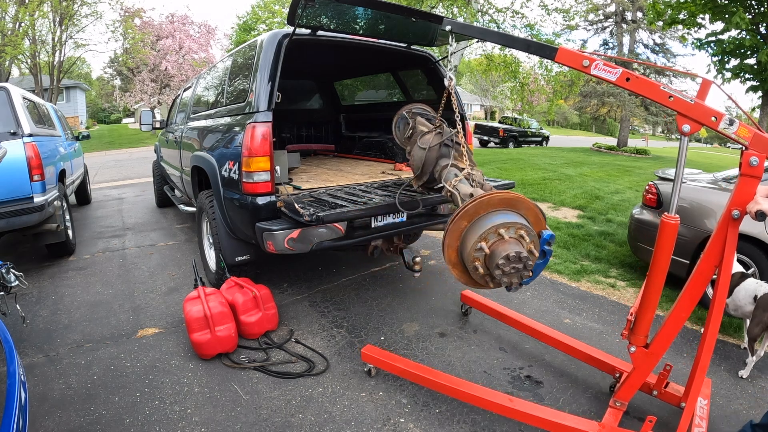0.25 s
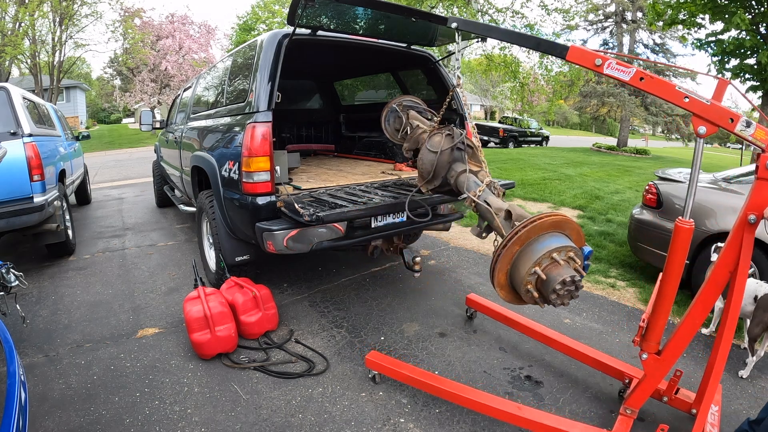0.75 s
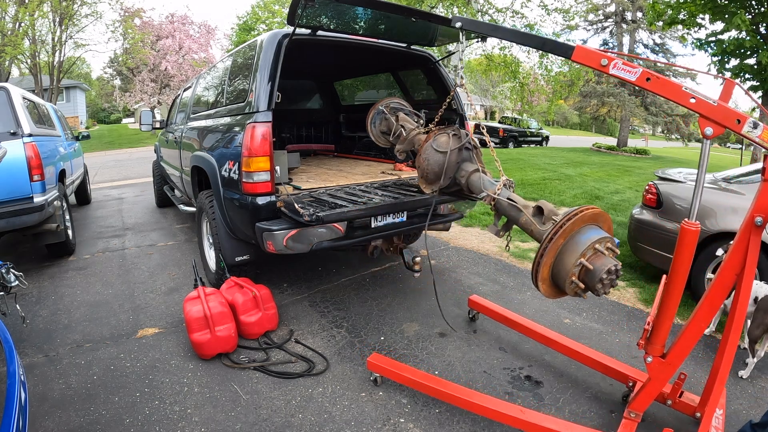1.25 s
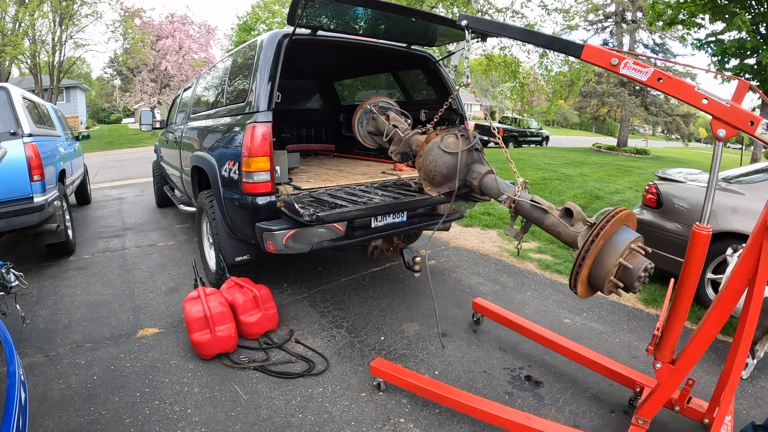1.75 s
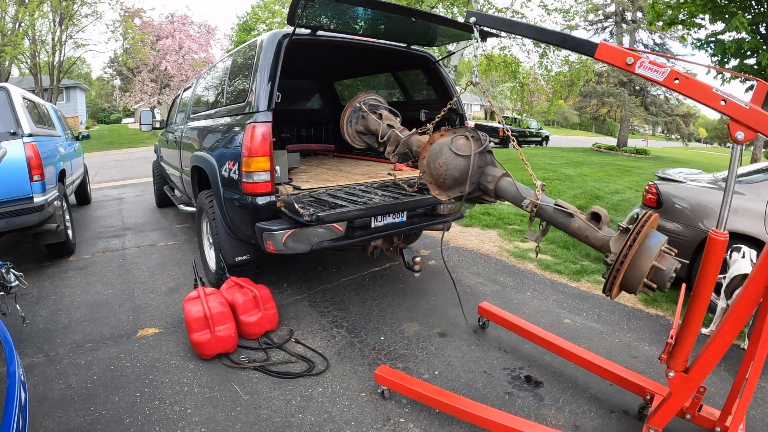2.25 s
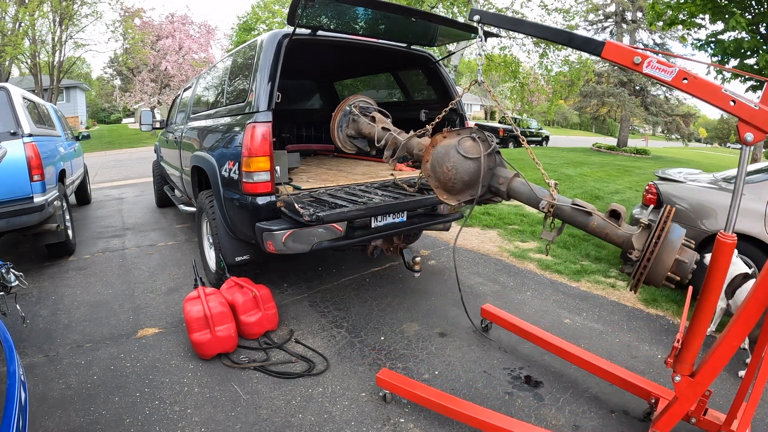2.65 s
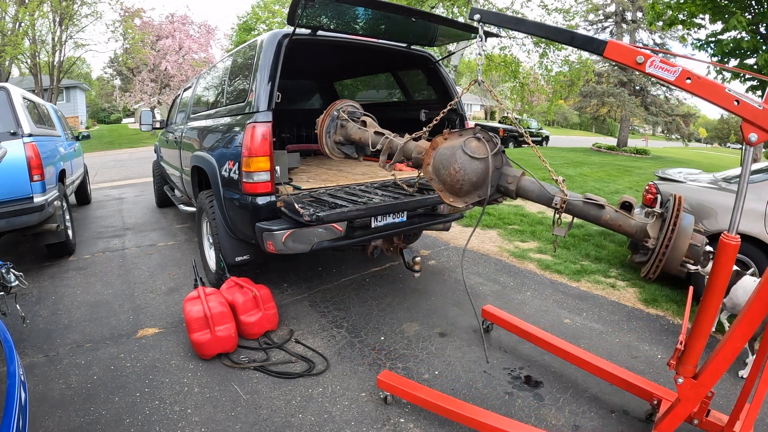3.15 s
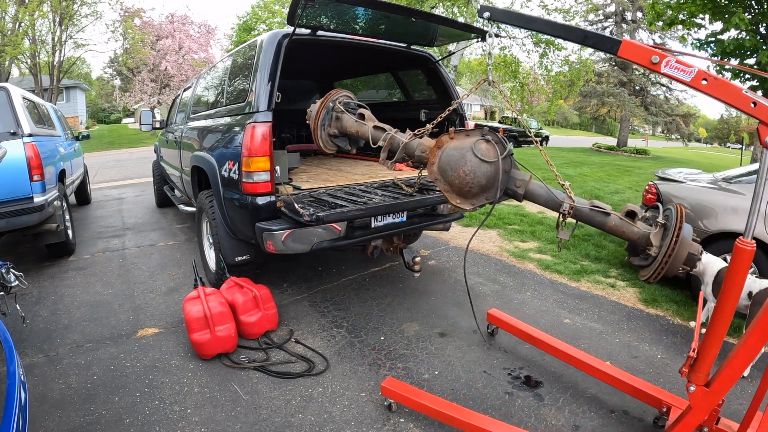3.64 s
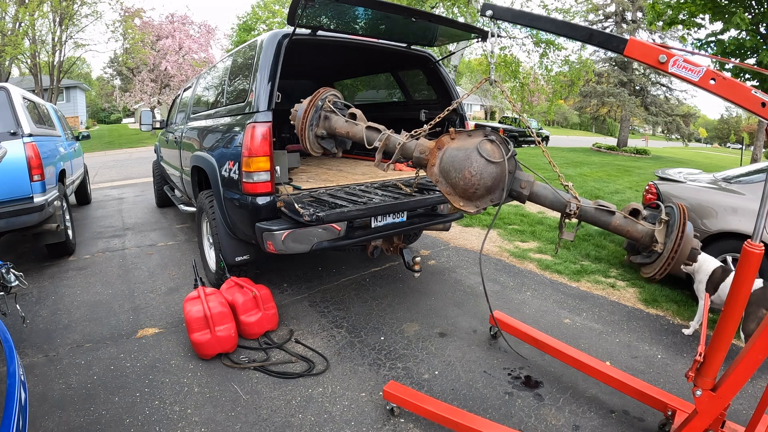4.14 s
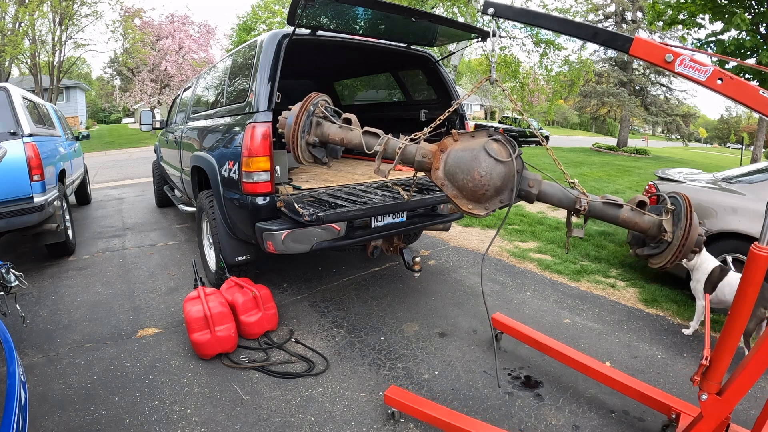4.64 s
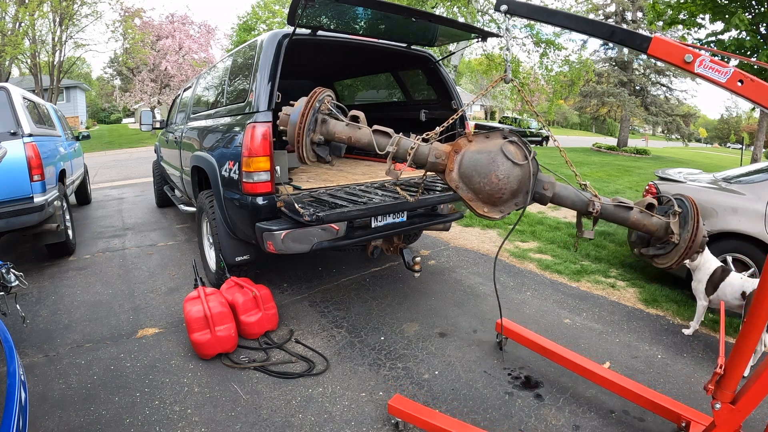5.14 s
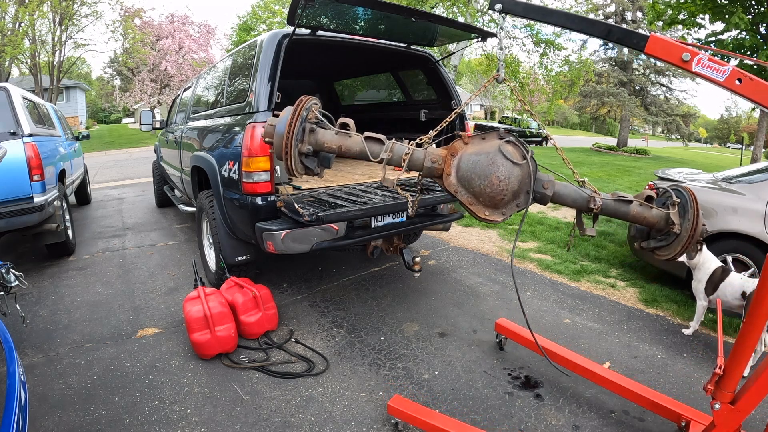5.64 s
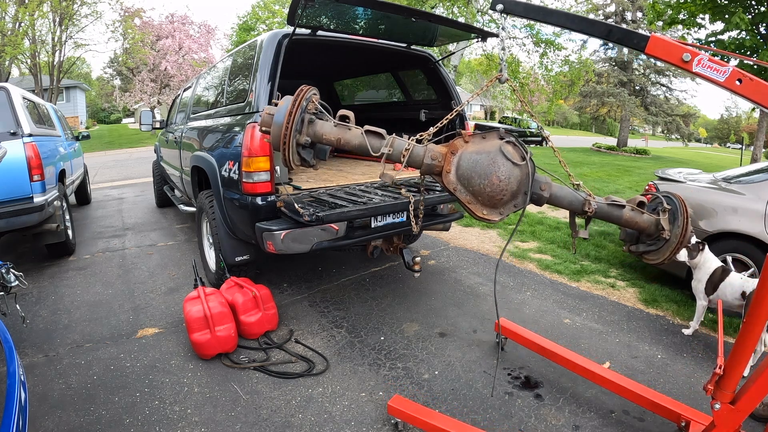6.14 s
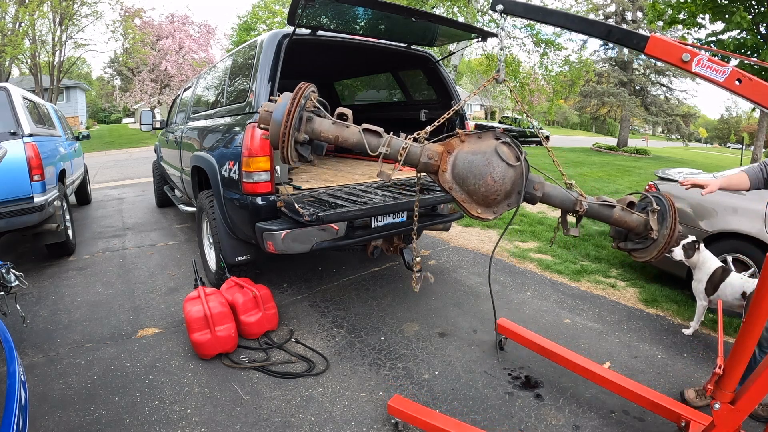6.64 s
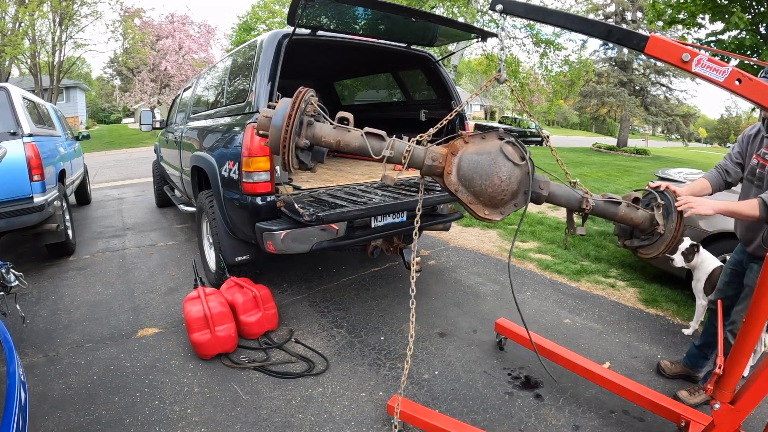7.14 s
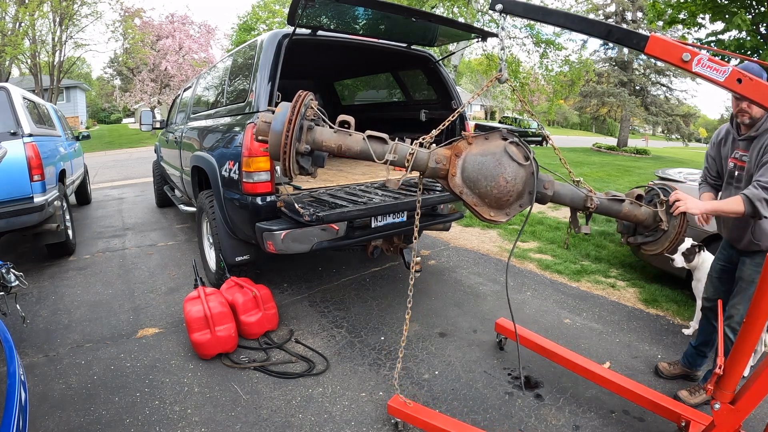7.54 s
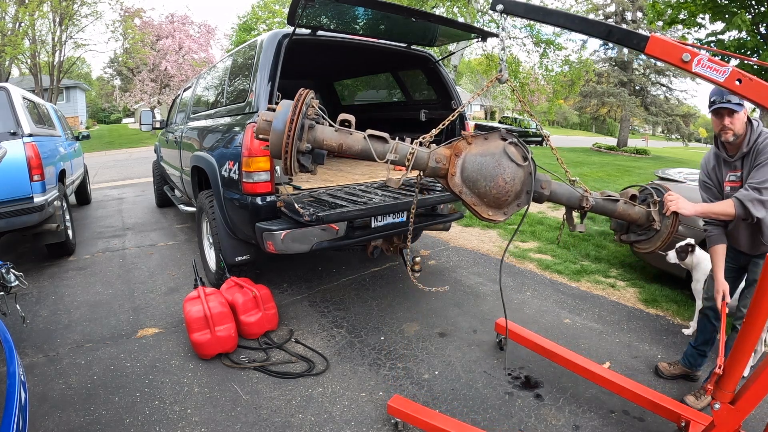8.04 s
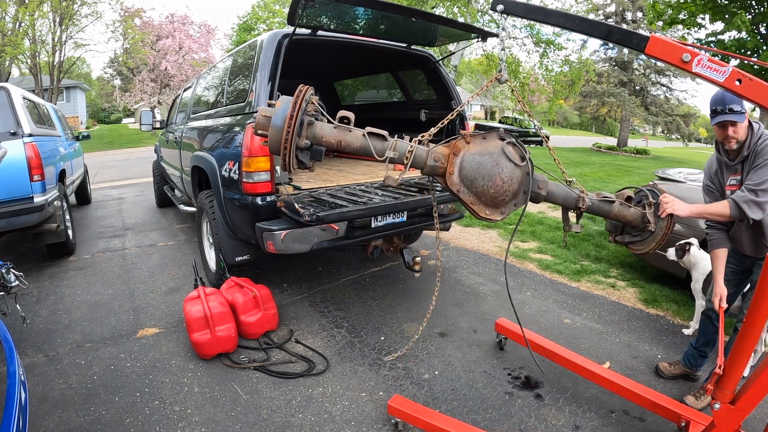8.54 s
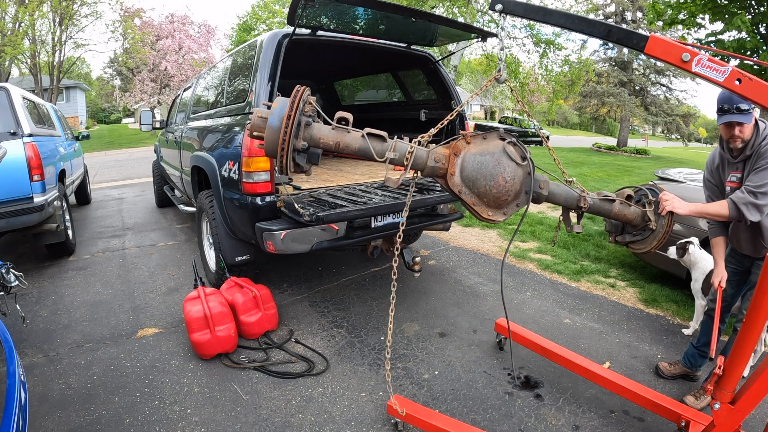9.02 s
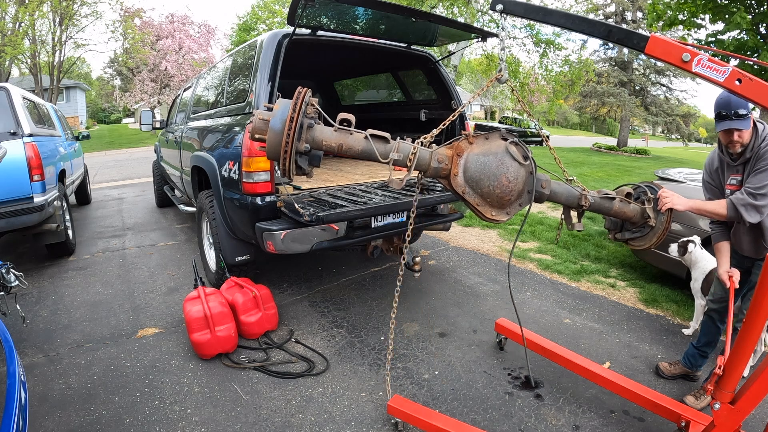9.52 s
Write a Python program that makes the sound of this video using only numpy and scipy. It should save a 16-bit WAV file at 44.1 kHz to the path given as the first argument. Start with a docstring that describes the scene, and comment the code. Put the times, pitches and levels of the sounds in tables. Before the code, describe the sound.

Outdoors on asphalt, a few light clanks and chain jingles build into the gritty rattle of a nearby steel hoist rolling on hard casters. It lurches along in several pushes, its tubes ringing at each bump, then comes to rest. The swinging chain ticks and twice hits the metal leg sharply. Behind it are soft shoe scuffs, a far songbird and a low hum that cuts off just before a faint squeak.

```python
"""An asphalt yard, where a steel engine hoist is dragged along. Its hard casters grind on grit and drop
off stones, shaking the frame and ringing its hollow tubes; heavy lurches thump the ground. Chain links
tinkle and tick, soles scuff, and once the hoist rests a loose chain end strikes a leg. A songbird
whistles far off, over a street hush and a low hum that cuts off; a faint squeak follows.
Cars and walls throw back short echoes."""
import sys
import numpy as np
from scipy import signal
from scipy.fft import rfft, irfft, next_fast_len
from scipy.io import wavfile
from scipy.ndimage import map_coordinates

SR = 44100
rng = np.random.default_rng(int(sys.argv[2]) if len(sys.argv) > 2 else 0)


def wrap_up_sound(samples):
    """Save the sound to the file named by the first command line argument, as 16-bit audio."""
    columns = np.atleast_2d(samples).T
    # keep every value between -1 and 1, then stretch to whole-number steps
    tamed = np.clip(columns, -1, 1)
    steps = np.round(tamed * 32767).astype(np.int16)
    wavfile.write(sys.argv[1], SR, steps)


N = 431298
TIME_S = np.arange(N) / SR

# The rolling grind, as the fader of its middle band: time_s, level_db
ROLLING = [(0.0, -62), (0.43, -95), (0.63, -49), (0.95, -45.5), (1.1, -54), (1.4, -106), (1.66, -40.5),
           (1.82, -34), (1.88, -32.5), (2.0, -29), (2.14, -32.5), (2.33, -44.5), (2.63, -39.5),
           (3.18, -60.5), (3.42, -45), (3.74, -34.5), (3.82, -29.5), (3.93, -34), (4.01, -46.5),
           (4.29, -45), (4.49, -32), (4.57, -33.5), (4.79, -41), (5.08, -45), (5.2, -42), (5.81, -37.5),
           (6.39, -31), (6.45, -33.5), (6.58, -66), (7.1, -77.5)]
# Casters dropping off stones: start_s, level_db, treble_offset_db, low_offset_db, tube_hz, ring_offset_db
STONE_DROPS = [(0.433, -35.5, -26, -20, 1267, -6), (0.461, -35.5, -28, -19, 1290, -10),
               (0.4877, -26, -26, -26, 1320, -7.5), (0.491, -27, -25, -30, 2940, -10),
               (0.493, -34, -30, -30, 1900, -10), (0.691, -32, -23, -16, 1287, -8.5),
               (0.8596, -23, -12.5, -21, 2820, -18), (1.041, -25.5, -16, -18.5, 1430, -22),
               (1.3055, -36.5, -12, -28, 1560, -22), (1.679, -24.5, -25, -20, 1570, -25),
               (1.711, -23, -11.5, -30, 1380, -15.5), (1.7947, -21.5, -32, -25.5, 1370, -17.5),
               (1.812, -16.5, -17.5, -28, 2030, -17.5), (1.8476, -15.5, -16.5, -19, 1390, -18.5),
               (1.893, -16, -20.5, -24, 2646, -18.5), (1.9242, -14, -12.5, -18, 960, -23),
               (2.021, -21.5, -19, -11, 1400, -17), (2.0556, -18, -15, -18, 970, -28),
               (2.081, -20, -19, -30, 1600, -17), (2.1333, -19, -17.5, -33, 964, -19.5),
               (2.165, -21, -12, -21, 1430, -27), (2.195, -20, -19, -22, 1400, -22),
               (2.268, -24, -18.5, -24, 2420, -19.5), (2.2854, -16.5, -33, -19.5, 1330, -22),
               (2.309, -17.5, -20.5, -21.5, 3040, -19.5), (2.5042, -20.5, -27, -20, 1295, -17.5),
               (2.595, -27, -26.5, -27, 2480, -21), (2.6783, -29, -15, -13.5, 1340, -20.5),
               (2.7712, -25, -22.5, -13, 1360, -33), (2.9708, -33, -37, -14.5, 1430, -20),
               (3.0751, -15, -17, -20.5, 1390, -16), (3.1098, -20.5, -29, -14.5, 1700, -18),
               (3.167, -25, -18.5, -25, 961, -22.5), (3.3762, -31.5, -39, -26, 1430, -9.5),
               (3.5382, -27, -5, -24.5, 3670, -7), (3.584, -23.5, -23.5, -22.5, 1400, -15.5),
               (3.592, -18.5, -14, -26, 940, -26), (3.6358, -13, -18.5, -24.5, 1380, -21.5),
               (3.651, -29.5, -25, -18.5, 3670, -7.5), (3.6978, -19.5, -19.5, -20.5, 1750, -17.5),
               (3.734, -19.5, -10.5, -24, 2450, -13.5), (3.7763, -25.5, 0.5, -20.5, 1390, -20.5),
               (3.802, -18, -26.5, -26, 1320, -13.5), (3.8148, -8, -10.5, -23, 1310, -18),
               (3.9048, -13, -12, -15, 744, -13), (4.095, -36, -7, -26, 2850, -16.5),
               (4.1919, -28.5, -23, -18.5, 1880, -21.5), (4.274, -21, -27, -25, 2430, -20),
               (4.3086, -23, -20.5, -17.5, 1440, -22), (4.339, -17, -15.5, -16.5, 1430, -16),
               (4.355, -12, -15, -26, 1360, -26.5), (4.3802, -13.5, -19.5, -17.5, 1470, -18.5),
               (4.4062, -13, -18.5, -26.5, 2480, -28.5), (4.4607, -13.5, -16.5, -26, 1420, -14),
               (4.5138, -17, -12.5, -23, 1490, -19.5), (4.5983, -19, -11.5, -28, 3200, -10.5),
               (4.6199, -11.5, -14, -28, 1370, -19), (4.657, -10, -14.5, -23, 1680, -28.5),
               (4.7742, -20, -15, -31, 1520, -25), (4.8137, -25, -20, -31, 1410, -24.5),
               (4.9833, -27.5, -24.5, -35, 1100, -21), (5.0379, -30, -18, -28, 2420, -11),
               (5.0565, -20.5, -21, -21.5, 2340, -16.5), (5.1072, -18.5, -22.5, -24, 935, -18),
               (5.2662, -20.5, -20.5, -38, 1460, -28.5), (5.361, -31, -14, -30, 1310, -21),
               (5.4146, -18, -11, -24, 965, -23.5), (5.5294, -21, -19, -20.5, 1410, -30.5),
               (5.552, -21, -18, -17.5, 1340, -27.5), (5.609, -32.5, -12, -13, 1410, -8),
               (5.775, -24.5, -31, -13, 1270, -23), (5.99, -19, -19.5, -22, 984, -21.5),
               (6.0518, -23.5, -23, -16, 1360, -17), (6.113, -26.5, -15, -17, 1710, -19.5),
               (6.1682, -15.5, -22.5, -13, 1470, -17.5), (6.2996, -9, -24.5, -18.5, 1360, -28),
               (6.3762, -15, -9.5, -17.5, 3240, -11), (6.4029, -12, -14.5, -24, 3030, -16),
               (6.456, -13, -9.5, -11.5, 1320, -25), (6.48, -20, -28.5, -12, 460, -17),
               (6.5081, -11, -15, -16.5, 756, -14), (6.534, -27, -20, -15, 968, -13),
               (6.8127, -32, -1, -42, 1520, -16), (6.8498, -38.5, -5, -24, 970, -15.5)]
def casters():
    """Grit shakes the frame and crackles; every drop off a stone adds a burst whose treble dies first."""
    stop = np.clip((ROLLING[-1][0] - TIME_S) / 0.141, 0, 1)
    halt_s = 6.58  # a low groan as the casters drag to a stop
    groan = amp(-27) * np.exp(-((TIME_S - halt_s) / np.where(TIME_S < halt_s, 0.16, 0.035)) ** 2)
    when, size = rng.random((700, 2)).T
    pebbles = decays(when * (N - 1) / SR, -6 - 9 * np.log10(size + .03), t60=0.035)  # crushed, they crack
    grind = {"low": np.hypot(follow_roll(-36, slope=0.83), groan) * np.hypot(0.73, 0.31 * pebbles),
             "middle": amp(curves(ROLLING)[0]) * np.hypot(0.59, 1.2 * pebbles),
             "treble": follow_roll(-50, slope=0.99) * np.hypot(0.84, 1.6 * pebbles)}
    start_s, level_db, treble_db, low_db, *_ = np.transpose(STONE_DROPS)
    jolt_db = {"low": level_db + low_db, "middle": level_db - 8.5, "treble": level_db + treble_db}

    def shake(register, t60):
        body = decays(start_s, jolt_db[register], t60, rise_s=0.0063)
        crack = decays(start_s, jolt_db[register] - 0.5, t60=0.015, rise_s=0.00034)
        jolts = body if register == "low" else np.hypot(body, crack)
        return np.hypot(stop * grind[register], jolts)
    return frame(shake)


# Tone of the shaken steel: frequency_hz, level_db
FRAME_EQ = [(120, -41.5), (200, -15), (350, -10.5), (410, -19), (550, -17.5), (1000, -5.5), (1350, -7),
            (1900, -4.5), (3100, -5.5), (4000, -14.5), (5200, -24.5), (7000, -25), (8500, -35),
            (11000, -32.5), (13500, -50.5), (16300, -69.5)]
# Edges of the frame's five bands: frequency_hz
BAND_EDGES = [240, 900, 2000, 4200, 8500, 40000]
# Tail of a jolt in each band: t60_s
BAND_TAILS = [0.41, 0.23, 0.15, 0.1, 0.029]
def frame(shake):
    """The frame answers in overlapping bands of gritty noise, each shaped by shake(register, t60)."""
    def steel(hz):
        peaks_db = sum(db / (1 + ((hz - pitch) / (width / 2)) ** 2) for pitch, width, db in TUBE_MODES)
        return amp(along(FRAME_EQ, hz) + peaks_db)

    def crossover(hz, edge_hz):
        return np.clip(.5 + 2 * np.log2((hz + 1) / edge_hz), 0, 1)

    grit = amp(1.5 * wobble(350) + 0.3 * wobble(60))
    bands, out = [], 0
    for low, high in zip(BAND_EDGES, BAND_EDGES[1:]):
        band = noise(lambda hz: steel(hz) * np.sqrt(abs(crossover(hz, low) - crossover(hz, high))), grit)
        bands.append(band * amp(0.19 * wobble(25)))
    for register, members in {"middle": (1, 2), "low": (0,), "treble": (3, 4)}.items():
        rms = np.sqrt(np.mean(sum(bands[k] for k in members) ** 2))
        out = out + sum(bands[k] / rms * shake(register, BAND_TAILS[k]) for k in members)
    return out


# Resonances of the hollow tubes: pitch_hz, width_hz, boost_db
TUBE_MODES = [(250, 81, 4), (366, 46, 4), (453, 34, 13), (515, 20, 11), (598.6, 60, 10), (691.6, 20, 9.5),
              (755, 22, 3), (964.8, 15, 11), (1215, 14, 8.5), (1311.6, 30, 5.5), (1365, 170, 6.5),
              (1425, 45, 3.5), (1520, 69, 3), (1673, 14, 8), (1926, 20, 2.5), (2420, 39, 5.5),
              (2707, 13, 5.5), (2970, 23, 0.5), (3200, 34, -1), (3660, 18, 4.5)]
def tubes():
    """Each jolt rings the hollow tubes; a narrow resonance rings long."""
    out = np.zeros(N)
    hz, width_hz, _ = np.transpose(TUBE_MODES)
    t60 = 1.09 * np.log(1000) / (np.pi * width_hz)
    for start_s, level_db, _, _, tube_hz, ring_db in STONE_DROPS:
        modes_db = level_db + ring_db + along(FRAME_EQ, hz) + contact_boost(hz, tube_hz, db=16)
        place(out, start_s, ring(hz, modes_db, t60, spread_db=3, rough=.007, seconds=.2, scatter=.1))
    return out


def grains():
    """Grains of grit under the wheels, a few much larger than the rest, each knock on the tubes."""
    def knock(hz):
        modes = sum((-1) ** k * amp(db + along(FRAME_EQ, pitch)) * 2j * hz * width
                    / (pitch ** 2 - hz ** 2 + 2j * hz * width + 1)
                    for k, (pitch, width, db) in enumerate(np.abs(TUBE_MODES)))
        return modes / (1 + 1j * hz / 2500) ** 3  # a soft contact rolls off the top

    when, size = rng.random((1500, 2)).T
    hits = np.bincount((when * N).astype(int), amp(-6 * np.log(size + .01)), N)
    return amp(curves(ROLLING)[0] - 5.5) * unit(filtered(hits, knock))


# Heavy lurches of the hoist: start_s, level_db, pitch_hz, t60_s
LURCHES = [(.51, -34.5, 101, 0.31), (1.27, -34.5, 90.4, 0.32), (1.614, -33, 97, 0.43),
           (2.191, -31, 70.6, 1), (2.471, -33.5, 99, 0.41), (3.167, -23, 86.5, 0.16),
           (4.421, -34.5, 95.5, 0.25), (4.682, -32.5, 98, 0.23), (4.832, -33, 107, 0.31),
           (5.092, -30, 98, 0.35), (6.233, -24, 99, 0.16), (6.446, -33.5, 93, 0.39),
           (6.55, -31, 190.8, 0.55), (7.465, -40, 95, 0.52)]
def thumps():
    """Each lurch thumps the ground: one rough low mode with a soft attack."""
    out = np.zeros(N)
    attack = 1 - np.exp(-TIME_S[:SR // 2] / 0.0058)
    for start_s, level_db, pitch_hz, t60 in LURCHES:
        thud = ring([pitch_hz], [level_db], [t60], spread_db=1.5, rough=0.0065, seconds=.5)
        place(out, start_s, attack * thud)
    return out


# Chain end hitting the leg: start_s, level_db, focus_hz, ring_offset_db, rattle_t60_s, low_offset_db
CHAIN_HITS = [(7.3526, -10.5, 2370, -21, 0.094, -19.5), (7.3855, -19.5, 2834, -14, 0.092, -11),
              (7.621, -37.5, 4960, 5.5, 0.17, -9.5), (7.6367, -5, 4840, 4, 0.26, -35.5),
              (7.652, -16, 7260, -3, 0.12, -27), (7.9308, -38, 1840, -10.5, 0.098, -24.5),
              (7.9634, -30, 1845, -28, 0.084, -24), (8.766, -37.5, 5800, 5.5, 0.072, -25.5),
              (8.7804, -6, 5830, 2.5, 0.19, -22.5), (8.791, -24, 3870, -1, 0.13, -9.5),
              (8.9148, -39, 1510, -10, 0.31, -2), (8.9824, -21, 2840, -13.5, 0.097, -12),
              (9.0366, -32.5, 1500, -9, 0.085, -2)]
# Main modes of the leg: pitch_hz
LEG_PITCHES = [1215, 1846, 2277, 2627, 2810, 2972, 3160, 3600, 3768, 3893, 3914, 4046, 4358, 4827, 4832,
               4925, 4980, 5104, 5195, 5523, 5857, 6740, 7260, 7610, 8075, 9935, 10590, 14070]
# Strength and tail of those modes: level_db, t60_s
LEG_MODES = [(-30, 0.61), (-31.5, 1.25), (-14.5, 0.17), (-21, 0.15), (-17.5, 0.23), (-13, 0.14),
             (-14.5, .16), (-11.5, 0.24), (-9.5, 0.25), (-15, 0.4), (-14, .3), (-10.5, .15), (-12, 0.21),
             (-14, 0.37), (-22.5, .28), (-17, .15), (-11, 0.21), (-16, .15), (-16.5, 0.22), (-17, 0.16),
             (-13, 0.17), (-15.5, 0.2), (-13, 0.28), (-11, 0.17), (-21, .25), (-8, 0.25), (-6, 0.13),
             (-15, .22)]
def chain_end():
    """The loose end rings the leg's main modes and many minor ones, over a splash of noise."""
    mode_db, mode_t60 = np.transpose(LEG_MODES)
    hz = np.array(LEG_PITCHES)
    splash_eq = [(500, -27.5), (1500, -16.5), (3000, -2.5), (6000, -6.5), (11000, -12.5),
                 (14000, -25.5), (15200, -42.5)]
    bright = eq_noise(splash_eq)
    position, sustain = rng.random((50, 2)).T
    minor_hz = 1800 + 12000 * position ** 1.1
    dull = eq_noise([(250, -27.0), (700, -10.5), (1500, 0.5), (2500, 2.0), (5000, -38.5)])
    metal, splash = np.zeros(N), 0
    for start_s, level_db, focus_hz, ring_db, rattle_t60, low_db in CHAIN_HITS:
        octaves_above = np.clip(np.log2(hz / focus_hz), 0, None)
        tone_db = contact_boost(hz, focus_hz, db=12) - 6.5 * octaves_above
        main_db = mode_db + level_db + ring_db - 14 + tone_db
        place(metal, start_s, ring(hz, main_db, mode_t60, spread_db=2, rough=.0012, scatter=.06))
        minor_db = level_db - 26 + along(splash_eq, minor_hz)
        minor_t60 = rattle_t60 * (.6 + sustain) * (3000 / minor_hz) ** .3
        place(metal, start_s, ring(minor_hz, minor_db, minor_t60, spread_db=4, rough=.0007, seconds=.25))
        burst = decays([start_s], [level_db], rattle_t60, rise_s=0.0012)
        splash = splash + (amp(-19) * bright + amp(low_db - 5.5) * dull) * burst
    return metal + splash


# Link striking link: start_s, level_db
LINK_HITS = [(0.375, -44), (0.4354, -33), (0.4594, -36.5), (0.4888, -28), (0.5437, -42), (0.6897, -25),
             (0.8, -46.5), (0.945, -51.5), (1.2905, -46.5), (1.3653, -41), (3.264, -53), (3.3774, -53.5),
             (4.043, -36), (4.093, -29.5), (4.1919, -29), (4.773, -30), (4.9491, -42)]
# Modes of one link: pitch_hz, level_db, t60_s
LINK_MODES = [(8850, -3, .11), (9250, 0, .12), (10800, -5, .06), (11350, 0, .1), (12700, -3, .07),
              (13200, -5, .06)]
def chain_links():
    """Links tinkle against each other, each hit slightly detuned, over a dry click."""
    tinkles = np.zeros(N)
    hz, mode_db, t60 = np.transpose(LINK_MODES)
    for start_s, level_db in LINK_HITS:
        detuned_hz = hz * (1 + .006 * rng.standard_normal(len(hz)))
        tinkle = ring(detuned_hz, mode_db + level_db - 20, t60, spread_db=4, rough=.011, seconds=.2)
        place(tinkles, start_s, tinkle)
    start_s, level_db = np.transpose(LINK_HITS)
    click = unit(noise(lambda f: np.clip(f / 9000, 0, 1) ** 2 * (f < 14000)))
    return tinkles + click * decays(start_s, level_db - 26, t60=.05)


# The chain settling as the hoist comes to rest: start_s, level_db, low_offset_db
SETTLING_TICKS = [(6.568, -36.5, -24.5), (6.62, -46.5, -25), (6.766, -40, -6.5), (6.786, -35, -4.5),
                  (6.801, -27, -13), (6.822, -24, -20.5), (6.835, -31.5, -11), (6.853, -27.5, -18),
                  (6.9, -41.5, -24), (6.915, -39, -30), (7.742, -41, -24.5), (7.78, -46.5, -25.5),
                  (8.541, -53, -2), (9.205, -47.5, -28.5), (9.2388, -48, -20), (9.434, -52.5, 3),
                  (9.456, -43.5, -15.5), (9.468, -50.5, -2), (9.493, -48.5, 2.5), (9.5402, -56.5, -7),
                  (9.553, -45.5, 3.5), (9.5609, -42, -14), (9.58, -61.5, 15), (9.61, -58.5, 17.5),
                  (9.688, -62, 12), (9.698, -64, 11), (9.735, -63, 14), (9.635, -35.5, -4),
                  (9.646, -49, -18.5), (9.7174, -41.5, -1)]
def chain_ticks():
    """The settling chain gives short dry clicks, each with its own share of dull knock."""
    start_s, level_db, low_db = np.transpose(SETTLING_TICKS)
    sharp = eq_noise([(2500, -11.5), (5000, -9.0), (11000, -6.0), (16000, -15.5)])
    dull = eq_noise([(400, -40), (1200, 3.0), (3000, 3.5), (5000, -25.0)])
    clicks = sharp * decays(start_s, level_db - 8.5, t60=0.033, rise_s=0.00025)
    return clicks + dull * decays(start_s, level_db + low_db - 10, t60=0.06, rise_s=0.00046)


# Strokes of a sole: start_s, loudest_s, end_s, level_db
SOLE_STROKES = [(0.045, 0.133, 0.23, -45.5), (7.206, 7.232, 8.3, -55.5), (8.054, 8.083, 8.13, -59)]
def scuffs():
    """Soles rub the asphalt: gritty noise that swells and fades."""
    strokes = sum(amp(db) * np.interp(TIME_S, times, [0, 1, .3], 0, 0) for *times, db in SOLE_STROKES)
    grit = amp(3.3 * wobble(250) + 1.2 * wobble(32))
    return strokes * eq_noise([(250, -1.0), (1200, -3.0), (3000, -5.5), (7000, -16.0), (15000, -35.5)], grit)


# Path of the squeak: time_s, pitch_hz, second_harmonic_db, upper_harmonics_db
SQUEAK_PATH = [(9.39, 960, -85, -65), (9.45, 965, -76, -71), (9.51, 1013, -70, -72), (9.56, 998, -64, -75),
               (9.63, 1001, -54, -76), (9.71, 963, -63, -71), (9.78, 956, -65, -72)]
def squeak():
    """A thin wavering squeak: harmonics two to four of one pitch, each flickering on its own."""
    pitch_hz, second_db, upper_db = curves(SQUEAK_PATH)
    phase = 2 * np.pi * np.cumsum(pitch_hz * (1 + 0.009 * wobble(45))) / SR
    third = amp(upper_db + 5 * wobble(40)) * np.sin(3 * phase)
    fourth = amp(upper_db - 4 + 5 * wobble(40)) * np.sin(4 * phase)
    second = amp(second_db + 4.5 * wobble(50)) * np.sin(2 * phase)
    return (TIME_S > SQUEAK_PATH[0][0]) * (second + third + fourth)


# Single whistles: start_s, length_s, first_hz, last_hz, level_db
BIRD_SLURS = [(0.937, 0.13, 2663, 3100, -51), (1.535, 0.1, 2640, 2635, -62),
              (7.543, 0.055, 2210, 2200, -67), (7.814, 0.082, 3780, 2650, -54.5),
              (7.903, 0.05, 3390, 2830, -65), (8.69, 0.094, 2900, 3720, -67)]
# A sagging note that drops into a warble: offset_s, length_s, first_hz, last_hz, level_db
BIRD_PHRASE = [(0, 0.233, 2619, 2407, -55.5), (0.115, 0.048, 2480, 2100, -55.5),
               (0.167, .07, 1980, 2150, -64), (.25, 0.046, 2135, 2200, -62.5)]
# Cues for that phrase: start_s, pitch_ratio, gain_db
PHRASE_CUES = [(8.081, 1., -1), (8.449, 0.98, -0.5)]
def bird():
    """A songbird whistles pure gliding tones, slightly unsteady, with soft ends."""
    out, flutter, waver = np.zeros(N), wobble(65), wobble(98)
    phrases = [(cue_s + offset_s, length_s, ratio * first_hz, ratio * last_hz, gain_db + level_db)
               for cue_s, ratio, gain_db in PHRASE_CUES
               for offset_s, length_s, first_hz, last_hz, level_db in BIRD_PHRASE]
    for start_s, length_s, first_hz, last_hz, level_db in BIRD_SLURS + phrases:
        t = TIME_S[:round(length_s * SR)]
        fade = np.clip(np.minimum(t, length_s - t) / 0.01, 0, 1)
        note = slice(round(start_s * SR), round(start_s * SR) + len(t))
        hz = np.linspace(first_hz, last_hz, len(t)) * (1 + 0.0088 * waver[note])
        out[note] += fade * amp(level_db + 3.9 * flutter[note]) * np.sin(2 * np.pi * np.cumsum(hz) / SR)
    return out


# Tone of the low drone: frequency_hz, level_db
DRONE_EQ = [(65, -44.5), (115, -22), (150, 4), (165, -1.5), (180, -5.5), (215, -8.5), (250, -24.5),
            (390, -41), (660, -120)]
# Tone of the rumble under it: frequency_hz, level_db
RUMBLE_EQ = [(12, -38.5), (25, -9.5), (45, -5.5), (58, -5), (69, 4.5), (81, -9.5), (97, 6), (118, -5.5),
             (140, -19.5), (290, -120)]
def hum(end_s=9.4):
    """A lumpy drone, swelling with the boom of the rolling legs, over a rumble; both stop at once."""
    leg_boom = follow_roll(-37, slope=0.87)
    drone = np.hypot(amp(-52), leg_boom) * unit(amp(2.8 * wobble(13)) * eq_noise(DRONE_EQ))
    rumble = amp(-54) * unit(amp(3.5 * wobble(19)) * eq_noise(RUMBLE_EQ))
    return (drone + rumble) * np.clip((end_s - TIME_S) / 0.0088, 0, 1)


# Tone of the street bed: frequency_hz, level_db
STREET_EQ = [(150, -29.5), (250, -9), (319, -6.5), (761, -12.5), (1100, -6), (1730, -12), (9660, -35.5),
             (16000, -43)]
def street():
    """A faint, gently wavering hush, heard when the hoist rests."""
    return amp(-66.5 + 2.2 * wobble(7.6)) * eq_noise(STREET_EQ)


# Reverb time of the yard: frequency_hz, t60_s
YARD_TAILS = [(500, 0.33), (3000, 0.21), (12000, 0.037)]
def yard(send):
    """Echoes from cars and walls; the highs die first."""
    hz, t, spectrum = signal.stft(rng.standard_normal((2, SR // 2)), SR, nperseg=256)
    tail = signal.istft(spectrum * amp(-60 * t / along(YARD_TAILS, hz)[:, None]), SR, nperseg=256)[1]
    return signal.fftconvolve(send, tail / np.linalg.norm(tail[0]), axes=1)[:, :N]


# How alike left and right are: frequency_hz, correlation
STEREO_LIKENESS = [(60, 0.99), (150, 1), (380, 0.97), (950, 0.95), (2380, 0.81), (5980, 0.81),
                   (15000, 0.82)]
def noise(gain, grit=1):
    """Stereo noise filtered by gain(hz), wider in the treble; grit is a texture both sides share."""
    def mid_side(hz):
        angle = np.arccos(along(STEREO_LIKENESS, hz)) / 2
        return gain(hz) * [np.cos(angle), np.sin(angle)]
    mid, side = filtered(grit * rng.standard_normal((2, N)), mid_side)
    return np.array([mid + side, mid - side])


def eq_noise(eq, grit=1):
    """Stereo noise at unit rms, coloured by (frequency_hz, level_db) points."""
    return unit(noise(lambda hz: amp(along(eq, hz)), grit))


def ring(hz, db, t60, spread_db, rough, seconds=1, scatter=1):
    """Damped modes at random strengths; rough lets phases wander, a small scatter starts them together."""
    hz, db, t60 = (np.asarray(column)[:, None] for column in (hz, db, t60))
    t = TIME_S[:round(seconds * SR)]
    strength, phase = rng.standard_normal((len(hz), 2)).T[..., None]
    drift = rough * np.cumsum(rng.standard_normal((len(hz), len(t))), 1)
    envelopes = amp(db + spread_db * strength - 60 * t / t60)
    modes = envelopes * np.sin(2 * np.pi * (hz * t + scatter * phase + drift))
    return modes.sum(0) * (1 - np.exp(-t / 0.00046))


def decays(start_s, db, t60, rise_s=.001):
    """Envelope of hits that add in power: a quick rise, then 60 dB lost in t60 seconds."""
    hits = np.bincount(np.round(np.asarray(start_s) * SR).astype(int), amp(db) ** 2, N)
    power = signal.lfilter([1], [1, -amp(-120 / (t60 * SR))], hits)
    lag = np.exp(-1 / (rise_s * SR))
    return np.sqrt(signal.lfilter([1 - lag], [1, -lag], power))


def contact_boost(hz, focus_hz, db):
    """A contact excites the modes near one pitch most, by up to db."""
    return db * np.exp(-(np.log(hz / focus_hz) / .06) ** 2)


def follow_roll(db, slope, hard_push_db=-30):
    """Gain that rides the grind: db at a hard push, moving slope dB for each dB of grind."""
    return amp(db + slope * (curves(ROLLING)[0] - hard_push_db))


def place(track, start_s, sound):
    track[round(start_s * SR):][:len(sound)] += sound[:N - round(start_s * SR)]


def amp(db):
    return 10 ** (np.asarray(db) / 20)


def unit(x):
    return x / np.sqrt(np.mean(x ** 2) + 1e-20)


def along(points, hz):
    """Read (frequency_hz, value) points on a log axis."""
    knots_hz, values = np.transpose(points)
    return np.interp(np.log(hz + 1), np.log(knots_hz + 1), values)


def curves(rows):
    """One automation curve for each column after the time."""
    time_s, *columns = np.transpose(rows)
    return [np.interp(TIME_S, time_s, column) for column in columns]


def wobble(rate):
    """A smooth random curve, rate knots a second."""
    return map_coordinates(rng.standard_normal(int(N * rate / SR) + 4), [TIME_S * rate])


def filtered(x, response):
    """Multiply the spectrum of x by response(hz)."""
    size = next_fast_len(N + 8192)
    return irfft(rfft(x, size) * response(np.fft.rfftfreq(size, 1 / SR)), size)[..., :N]


def scene():
    """The mix: chain, soles, tube knocks and bird feed the yard's echo; the rest stays dry."""
    near = chain_end() + chain_links() + chain_ticks() + scuffs()
    knocks, song = tubes() + grains(), bird()
    echoes = yard(amp(-9) * near + amp(-16.5) * knocks + amp(-0.5) * song)
    return casters() + near + knocks + thumps() + squeak() + amp(-3) * song + echoes + hum() + street()


# Balance of the two microphone ports: frequency_hz, left_over_right_db
PORT_BALANCE = [(100, -0.1), (300, -0.5), (1000, -1), (2500, -1.1), (5000, -0.8), (9000, 1.5), (14000, 2)]
# Phase between them: frequency_hz, left_lead_rad
PORT_PHASE = [(100, -0.12), (1000, -0.36), (3100, -0.24), (5860, -0.75), (9400, -0.21), (12000, 0.037)]
def record(dry):
    """The two ports differ a little in colour and phase; nothing passes above the band limit."""
    split, top_hz = np.array([[.5], [-.5]]), 16400
    ports = lambda hz: amp(split * along(PORT_BALANCE, hz)) * np.exp(1j * split * along(PORT_PHASE, hz))
    return filtered(dry, lambda hz: ports(hz) * (hz < top_hz))


dry = scene()
out = record(dry)
wrap_up_sound(out)
```